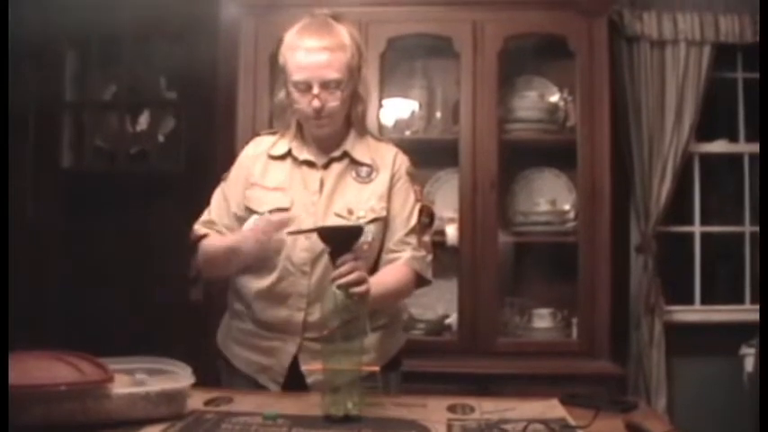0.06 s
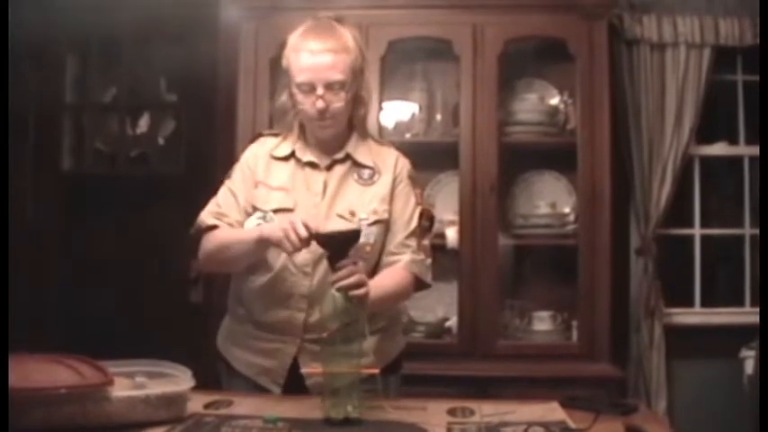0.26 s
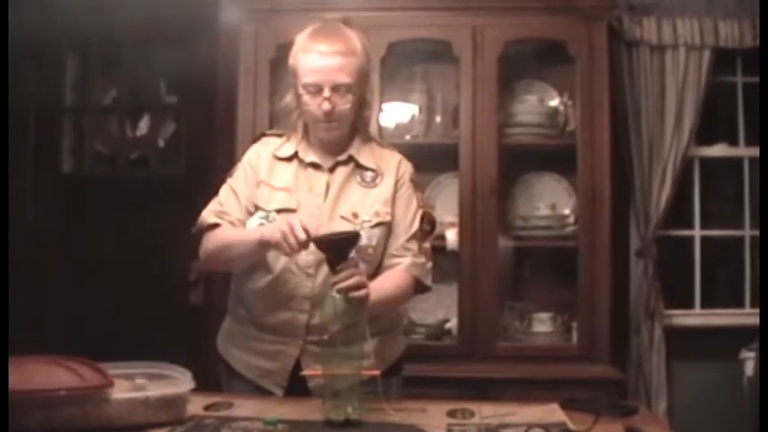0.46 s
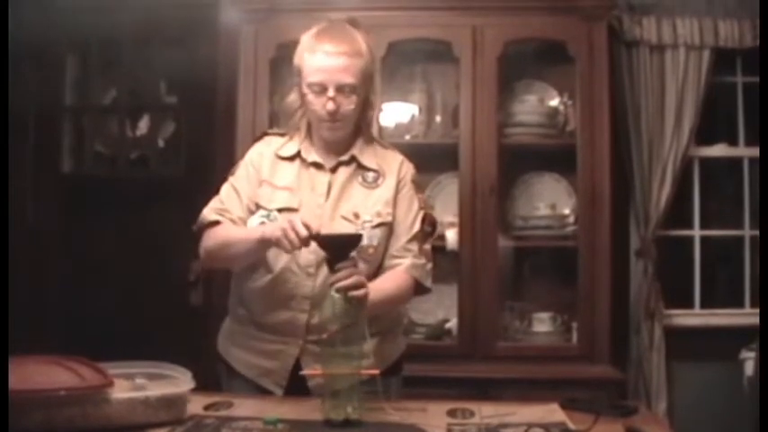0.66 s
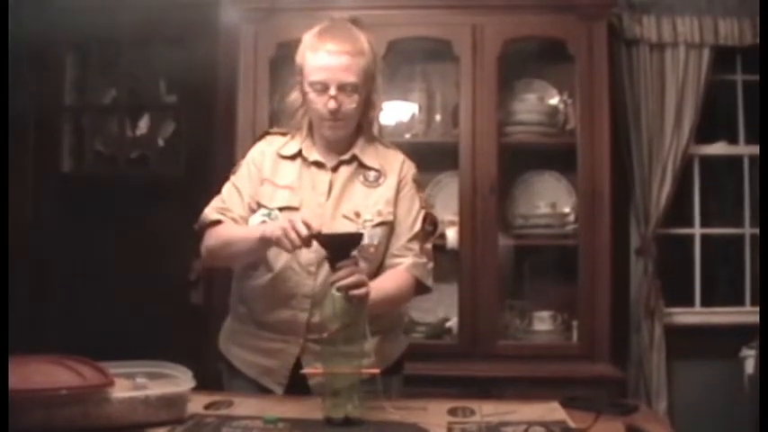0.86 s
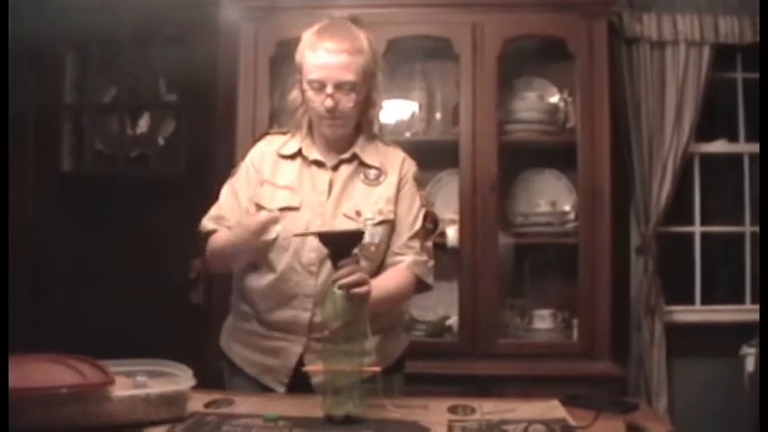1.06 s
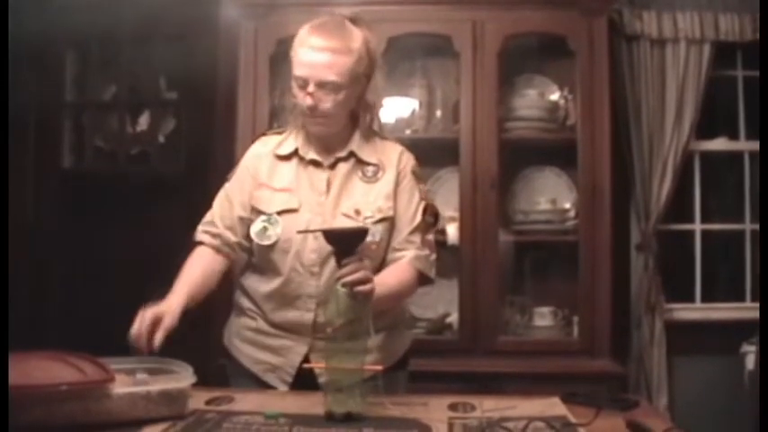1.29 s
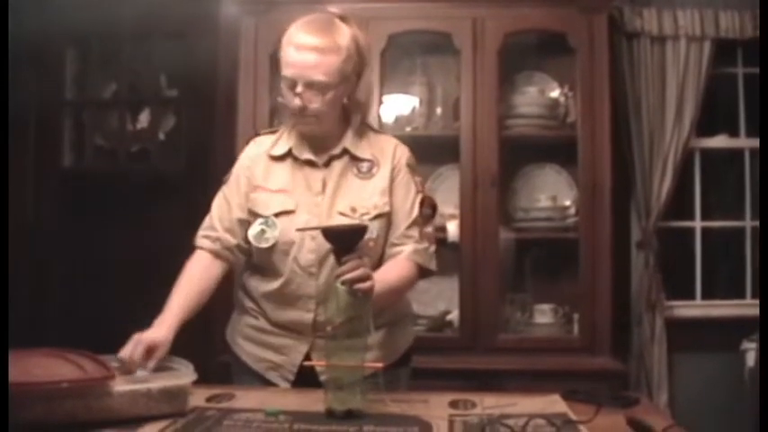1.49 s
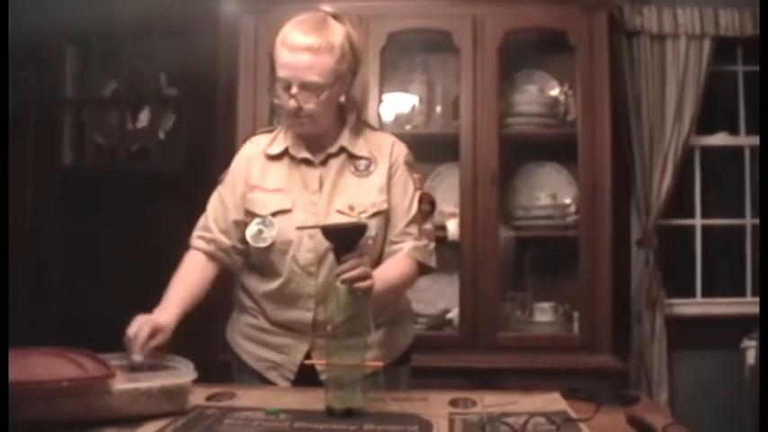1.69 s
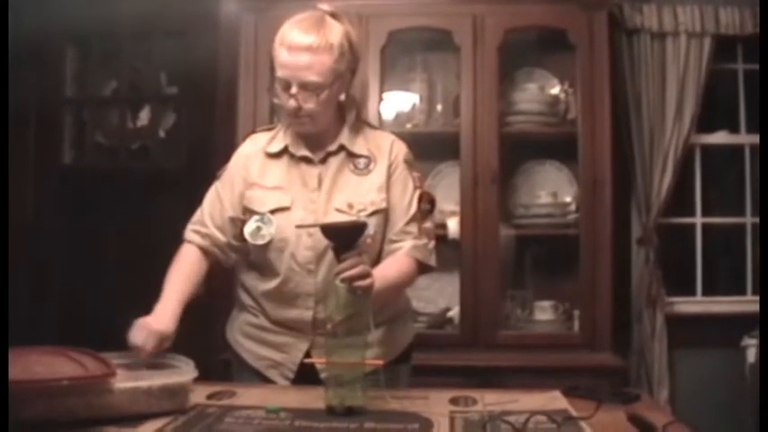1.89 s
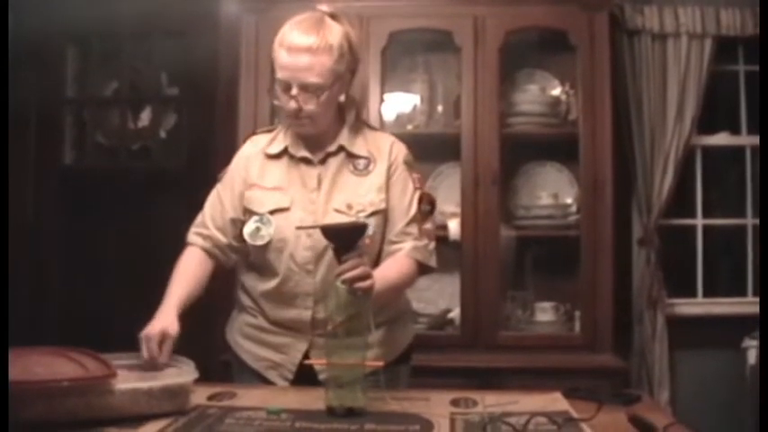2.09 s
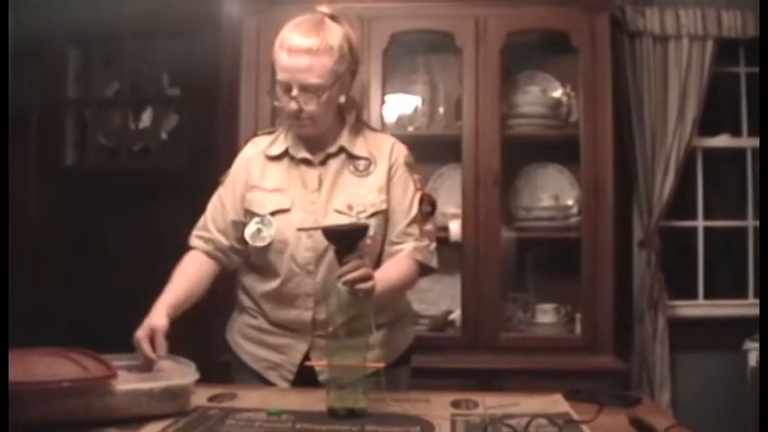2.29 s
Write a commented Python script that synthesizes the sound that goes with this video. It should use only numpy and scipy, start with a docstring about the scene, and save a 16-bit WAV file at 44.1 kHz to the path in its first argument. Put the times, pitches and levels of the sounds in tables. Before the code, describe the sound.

Dry seed hisses through a plastic funnel into a plastic bottle after a few hollow knocks.

```python
"""A plastic funnel knocks in the neck of a plastic bottle, then dry seed hisses down through it.
Thousands of tiny impacts make funnel and bottle ring, and single seeds tick off the rim.
Clumps of seed tap the bottle, the bottle bumps the table, and a hand rummages in the seed tub.
At the end the stream thins to a trickle. The room around it is quiet."""
import sys
import numpy as np
from scipy import signal
from scipy.fft import rfft, irfft
from scipy.io import wavfile

SR = 44100
rng = np.random.default_rng(int(sys.argv[2]) if len(sys.argv) > 2 else 0)


def unload_audio(sound):
    """Save the sound as a 16-bit wav file, at the path given as the first command line argument."""
    columns = np.transpose(np.atleast_2d(sound))
    # keep every value between -1 and 1, then stretch to whole-number steps
    steps = np.round(np.clip(columns, -1, 1) * 32767)
    wavfile.write(sys.argv[1], SR, steps.astype(np.int16))


N = 108045

# The notes that seed rings in funnel and bottle. Each row: pitch in Hz, width in Hz, level in dB.
BODY_NOTES = [(342, 32, -1.5), (433.2, 35.7, 4), (580, 10, -20), (787, 17, -5.5), (986, 78, 2),
              (1536, 130, -11), (1836, 40, -6), (2130, 40, -5), (2305, 260, -6), (2840, 270, -5)]
CONTACT_S = 0.00087  # how quickly a struck note builds up


def undb(db):
    return 10 ** (np.asarray(db) / 20)


def unit(x):
    """Scale a sound to an average power of 1."""
    return x / np.sqrt(np.mean(x ** 2))


def gains(points, hz):
    """Read gains off a curve whose rows are frequency in Hz, level in dB."""
    curve_hz, db = np.array(points, float).T
    return undb(np.interp(np.log(hz + 1), np.log(curve_hz), db))


def colour(x, points):
    """Shape bass and treble to follow a curve; white noise keeps its power."""
    size = 4096
    gain = unit(gains(points, np.fft.rfftfreq(size, 1 / SR)))
    # Folding the cepstrum keeps the filter from sounding ahead of a hit.
    cepstrum = irfft(np.log(gain))
    cepstrum[1:size // 2] *= 2
    cepstrum[size // 2 + 1:] = 0
    return signal.fftconvolve(x, irfft(np.exp(rfft(cepstrum))))[:len(x)]


def resonate(x, hz, width_hz):
    """Keep a band around one pitch, so that it rings."""
    return signal.lfilter(*signal.iirpeak(hz, hz / width_hz, fs=SR), x)


def soften(x, hz, order=1):
    """Gently turn down everything above hz."""
    return signal.lfilter(*signal.butter(order, min(hz, SR / 2 - 1), fs=SR), x)


def low_cut(x, hz):
    return signal.lfilter(*signal.butter(2, hz, "high", fs=SR), x)


def fade(t, fade_s):
    """Die away by 60 dB in fade_s seconds, the fade time."""
    return np.exp(-np.log(1000) * t / fade_s)


def add(out, at_s, x):
    """Mix a sound in at a given time."""
    i = int(np.clip(at_s * SR, 0, N - 1))
    out[i:i + len(x)] += x[:N - i]


def blows(events, notes, rattle_curve):
    """Each blow rings an object's notes and rattles briefly; a softer contact is duller."""
    t = np.arange(SR // 2) / SR
    out = np.zeros(N)
    for at, db, cutoff_hz, rattle_db in events:
        detunes = 1 + 0.0023 * rng.standard_normal(len(notes))
        phases = 2 * np.pi * rng.random(len(notes))
        ring = sum(undb(note_db) * fade(t, fade_s) * np.sin(2 * np.pi * hz * detune * t + phase)
                   for (hz, note_db, fade_s), detune, phase in zip(notes, detunes, phases))
        ring = low_cut(ring * (1 - np.exp(-t / CONTACT_S)), notes[0][0])
        rattle = colour(rng.standard_normal(len(t)) * fade(t, 0.21), rattle_curve)
        add(out, at, undb(db) * soften(ring / 2 + undb(rattle_db) * rattle, cutoff_hz))
    return out


def room_tone():
    """The faint, low, steady noise of a quiet room."""
    # Its colour. Each row: frequency in Hz, level in dB.
    tone_curve = [(25, -40), (70, -2), (130, 3.5), (230, 1.5), (350, 6), (700, -4), (1500, -7), (4000, -19),
                  (8000, -19.5), (15000, -37)]
    return undb(-56) * unit(colour(rng.standard_normal(N), tone_curve))


def funnel_knocks():
    """The funnel knocks in the bottle's neck, and its plastic rings and rattles."""
    # The knocks. Each row: start in seconds, level in dB, treble cutoff in Hz, rattle in dB.
    knocks = [(0.0, -39, 400, -10), (.228, -28, 590, -1.5), (.28, -40, 350, 0), (.322, -38.5, 400, -5),
              (.3785, -28.5, 600, -3), (.4225, -14, 920, -9.5), (.46, -17, 900, -2.5), (.468, -26, 1790, 5),
              (.486, -26.5, 1790, -2.5), (.6295, -14, 400, -16)]
    # The funnel's notes. Each row: pitch in Hz, level in dB, fade time in seconds.
    funnel_notes = [(154, -27, 0.13), (344, -1, 0.14), (375, -12, 0.17), (430.8, -4, .15),
                    (450, -1.5, 0.051), (589.7, -12, 0.3), (649, -20, 0.31), (723, -22, 0.27),
                    (789, -17, 0.45), (886, -11.5, 0.34), (1010, -22, .1), (1350, -16, .08),
                    (1600, -19, 0.087), (1720, -17, 0.2)]
    # The rattle's colour. Each row: frequency in Hz, level in dB.
    rattle_curve = [(40, -48), (90, -27), (150, -16.5), (260, -12), (400, 5), (800, -3), (1300, -7),
                    (3000, -7.5), (8000, -11), (11000, -9), (15000, -34)]
    return blows(knocks, funnel_notes, rattle_curve)


def hand_noise(t):
    """Hand and sleeve rustle at the funnel; later the hand digs dully in the seed tub."""
    # Swells of noise. Each row: peak time in seconds, spread in seconds, level in dB, pitch in Hz.
    swells = [(0.186, 0.037, -67, 1750), (0.248, 0.029, -58, 5100), (0.348, 0.025, -59, 6700),
              (1.747, 0.037, -53, 70.5), (1.96, 0.026, -57, 75.6), (1.707, 0.07, -56.5, 143),
              (2.36, .035, -57, 148)]
    out = np.zeros(N)
    for at, spread_s, db, hz in swells:
        band = resonate(rng.standard_normal(N), hz, hz * .6)
        band = unit(resonate(band, hz, hz * .6))
        out += undb(db) * np.exp(-.5 * ((t - at) / spread_s) ** 2) * band
    return out


def funnel_rub(t):
    """The funnel sticks and slips as it turns in the neck, giving a short hollow groan."""
    peak_s, spread_s, pitch_hz = .247, 0.016, 423
    roughness = 1 + 0.66 * unit(soften(rng.standard_normal(N), 85, order=2))
    swell = np.exp(-.5 * ((t - peak_s) / spread_s) ** 2)
    return undb(-37.5) * swell * roughness * np.sqrt(2) * np.sin(2 * np.pi * pitch_hz * t)


def table_bumps():
    """The bottle bumps the table, which thuds and rings low."""
    # The bumps. Each row: start in seconds, level in dB, treble cutoff in Hz, thud in dB.
    bumps = [(.376, -38.5, 110, 11), (1.315, -23, 400, -21), (1.326, -22, 500, -12.5),
             (1.359, -44, 400, -16), (1.468, -33.5, 303, -1.5)]
    # The table's notes. Each row: pitch in Hz, level in dB, fade time in seconds.
    table_notes = [(132, -18, 0.19), (194, -2.5, 0.22), (228.3, -4.5, 0.18), (273, 1, 0.16),
                   (325, -13.5, 0.4), (357, -4, 0.22)]
    # The thud's colour. Each row: frequency in Hz, level in dB.
    thud_curve = [(30, -28), (70, -40), (130, -5.5), (230, -1), (400, 1), (800, -22), (3000, -68)]
    return blows(bumps, table_notes, thud_curve)


def seed_stream(flow):
    """Countless tiny impacts, denser as more seed flows, hiss and ring funnel and bottle."""
    # The colour of one impact. Each row: frequency in Hz, level in dB.
    impact_curve = [(40, -30), (110, -31.5), (220, -23), (600, -8), (1250, -10), (2200, -5.5), (3600, -5),
                    (5000, -2), (7300, 0), (8700, -1), (10200, -9), (12500, -17.5), (15800, -26.5)]
    peak_hits_per_s, spread_db, ring_s = 5000, 3.5, 0.00016
    density = (flow / flow.max()) ** .45
    lands = rng.random(N) < density * peak_hits_per_s / SR
    hits = lands * undb(spread_db * np.clip(rng.standard_normal(N), -2, 2))
    energy = signal.lfilter([1], [1, -np.exp(-2 / (ring_s * SR))], hits ** 2)
    energy = energy / density / (np.mean(energy) / np.mean(density))  # only the flow sets loudness
    sliding = undb(-7.5) ** 2  # seeds rubbing past each other
    grains = flow * np.sqrt((energy + sliding) / (1 + sliding)) * rng.standard_normal(N)
    body = sum(undb(db) * resonate(grains, hz, width) for hz, width, db in BODY_NOTES)
    return colour(grains, impact_curve) + 2 * undb(-3.5) * low_cut(body, 237)


def rim_ticks(flow):
    """Single seeds strike the rim: a tiny high ring and a crack with a brief tail."""
    # The hard ticks. Each row: start in seconds, level in dB, pitch in Hz.
    hard_ticks = [(.4237, -24, 7500), (.444, -23, 8000), (.5755, -18, 6600), (.5832, -18, 7800),
                  (.5984, -11, 6400), (.6168, -15, 6500), (.6267, -11, 7500), (.6432, -14, 6900),
                  (.6857, -7, 7800), (.688, -13, 7600), (.7467, -18, 8700), (.7701, -14, 7950),
                  (.7862, -17, 7500), (.7957, -15, 7200), (.8022, -14, 7600), (.8226, -14, 6400),
                  (.8683, -16, 7100), (.9694, -17, 8200), (1.0413, -15, 7800), (1.0522, -19, 8000),
                  (1.1074, -15, 8300), (1.2102, -18, 7000), (1.2159, -16, 7000), (1.2181, -15, 7200),
                  (1.2735, -8, 7700), (1.2808, -17, 8200), (1.3217, -11, 7700), (1.4037, -18, 7500),
                  (1.4885, -18, 8500), (1.548, -18, 7000), (1.7205, -17, 6300), (1.8667, -10, 7450),
                  (2.0568, -20, 7500), (2.1248, -22, 8000), (2.1628, -16, 7950), (2.2398, -28, 7500),
                  (2.282, -29, 7500), (2.322, -29, 8500), (2.3523, -21, 6000), (2.4212, -34, 7500)]
    # The crack's colour. Each row: frequency in Hz, level in dB.
    crack_curve = [(500, -29), (3000, -20.5), (7500, 10.5), (11000, -3.5), (15000, -13.5)]
    bounces_per_s, ring_s, tail_s = 60, .00035, 0.0083
    bounces = []  # more ticks at random times, louder when more seed flows
    for when, softness, pitch in rng.random((int(bounces_per_s * N / SR), 3)):
        flow_db = 20 * np.log10(flow[int(when * N)])
        bounces.append((when * N / SR, flow_db + 6 - 8 * softness, 5500 + 3500 * pitch))
    t = np.arange(SR // 20) / SR
    decay = np.exp(-t / ring_s)
    tail = undb(-18) * np.exp(-t / tail_s)
    rings, crack_energy = np.zeros(N), np.zeros(N)
    for at, db, hz in hard_ticks + bounces:
        add(rings, at, undb(db) * decay * np.sin(2 * np.pi * hz * t))
        add(crack_energy, at, undb(db) ** 2 * ((0.53 * decay) ** 2 + tail ** 2))
    cracks = np.sqrt(crack_energy) * rng.standard_normal(N)
    return low_cut(rings, 3500) + colour(cracks, crack_curve)


def seed_clumps():
    """Clumps of seed land in the bottle, ring it briefly and splash apart."""
    # The landings. Each row: start in seconds, ring level in dB, splash level in dB.
    landings = [(.888, -29.5, -40), (1.329, -39, -24), (1.544, -35, -30), (1.8665, -33.5, -40)]
    t = np.arange(SR // 4) / SR
    ring = sum(undb(db) * np.exp(-np.pi * width * t / 2) * np.sin(2 * np.pi * (hz * t + rng.random()))
               for hz, width, db in BODY_NOTES)
    ring = low_cut(ring * (1 - np.exp(-t / CONTACT_S)), 805)
    out = np.zeros(N)
    for at, ring_db, splash_db in landings:
        splash = soften(rng.standard_normal(len(t)), 6000, order=2) * fade(t, 0.11)
        add(out, at, undb(ring_db) * ring + undb(splash_db) * splash)
    return out


def room(x, echo_db):
    """A furnished room adds a short, dense tail of echoes."""
    t = np.arange(SR // 2) / SR
    tail = soften(rng.standard_normal(len(t)), 9300) * fade(t, 0.77) * (1 - np.exp(-t / 0.0048))
    return x + undb(echo_db) * signal.fftconvolve(x, tail / np.sqrt(np.sum(tail ** 2)))[:N]


def microphones(x):
    """Two close microphones hear nearly the same; scattered echoes set them apart."""
    # The stereo width. Each row: frequency in Hz, level of the side signal against the middle in dB.
    width_curve = [(50, -23), (130, -3), (280, -19.5), (500, -12.5), (2000, -13), (4000, -8.5),
                   (7500, -26.5), (10000, -11.5), (13000, -5)]
    t = np.arange(SR // 5) / SR
    scatter = rng.standard_normal(len(t)) * fade(t, 0.19)
    side = signal.fftconvolve(x, scatter / np.sqrt(np.sum(scatter ** 2)))[:N]
    side = irfft(rfft(side, 2 * N) * gains(width_curve, np.fft.rfftfreq(2 * N, 1 / SR)))[:N]
    return np.array([x + side, x - side])


def scene():
    """Mix the pouring seed and the handling sounds in the room, in stereo."""
    # How strongly the seed flows. Each row: time in seconds, level in dB.
    flow_curve = [(.395, -110), (.415, -58), (.43, -42.5), (.48, -31), (.53, -35.5), (.6, -29.5), (.8, -32),
                  (.92, -31.5), (1.35, -32), (1.65, -31.5), (1.95, -32), (2.06, -33.5), (2.2, -43),
                  (2.33, -48), (2.45, -56.5)]
    t = np.arange(N) / SR
    flow = undb(np.interp(t, *np.array(flow_curve).T))
    seeds = room(seed_stream(flow) + rim_ticks(flow) + seed_clumps(), echo_db=-10)
    handling = room(funnel_knocks() + funnel_rub(t) + table_bumps(), echo_db=-13)
    slightly_left = undb([[0.25], [-0.25]])
    return microphones(seeds + hand_noise(t) + room_tone()) + slightly_left * microphones(handling)


def record(dry):
    """Thin the deep bass and cut the highest treble."""
    treble_cut = signal.ellip(10, .2, 80, 15900, fs=SR, output="sos")
    return signal.sosfilt(treble_cut, low_cut(dry, 39))


dry = scene()
out = record(dry)
unload_audio(out)
```